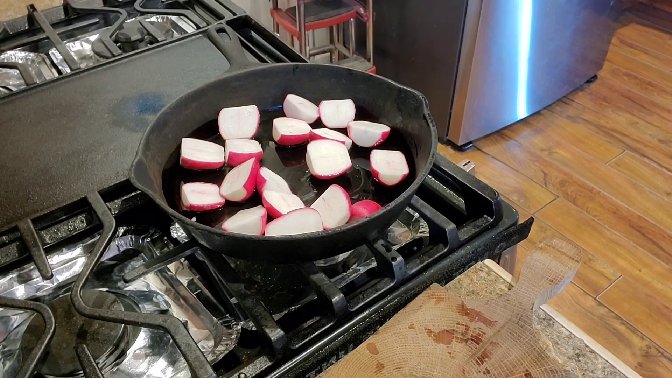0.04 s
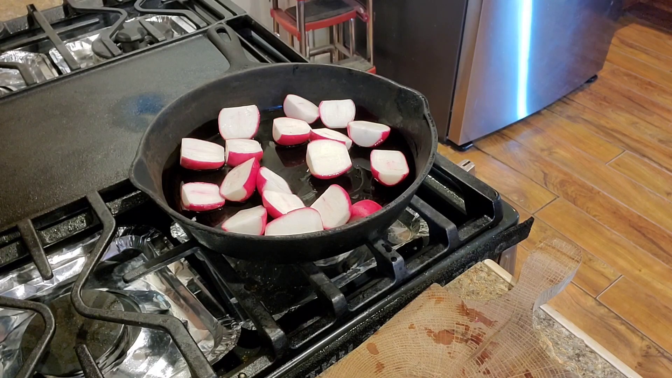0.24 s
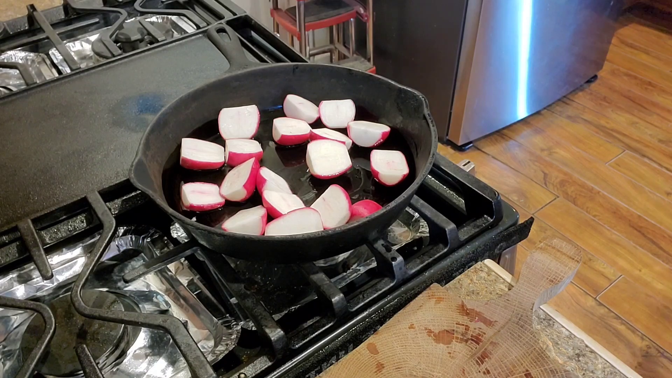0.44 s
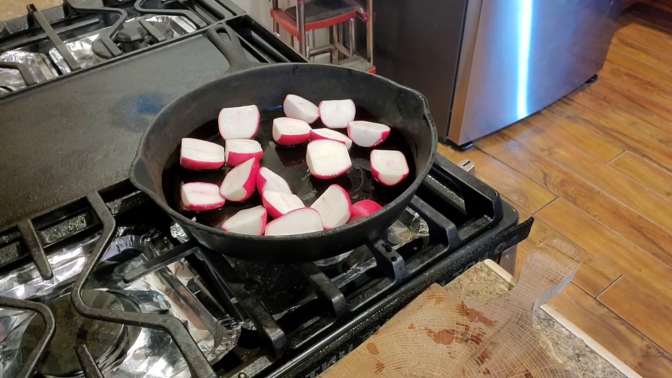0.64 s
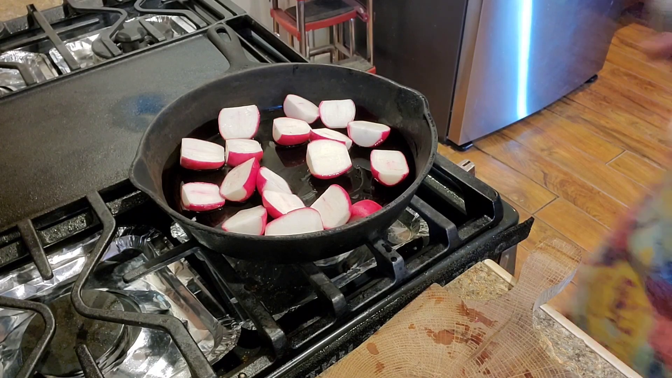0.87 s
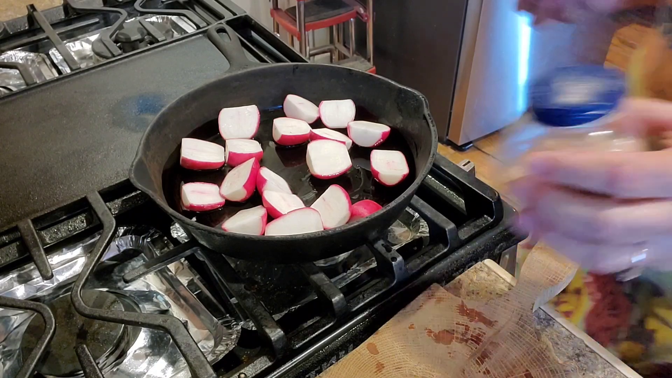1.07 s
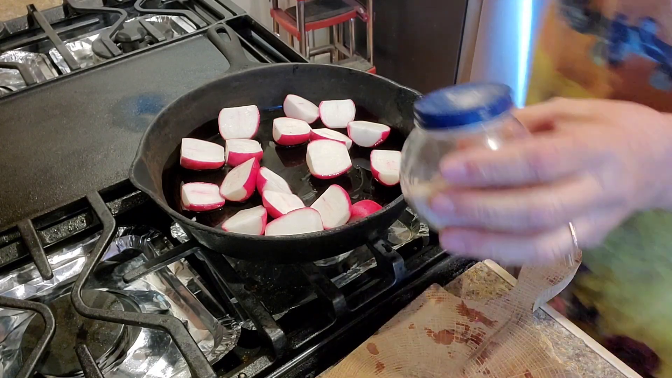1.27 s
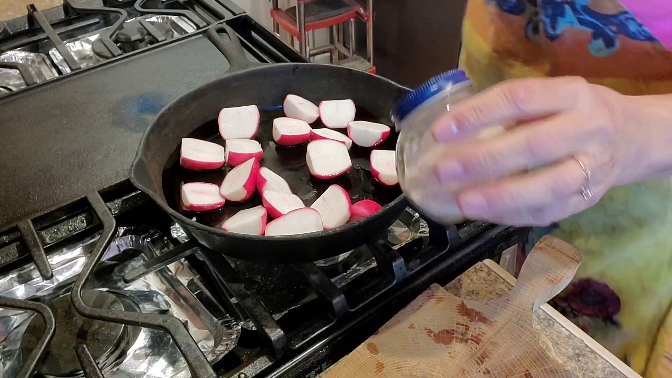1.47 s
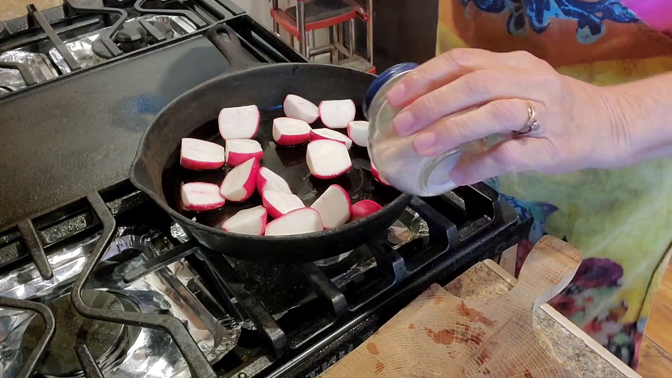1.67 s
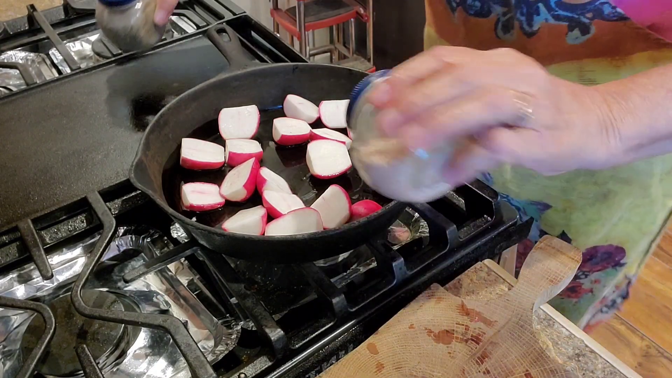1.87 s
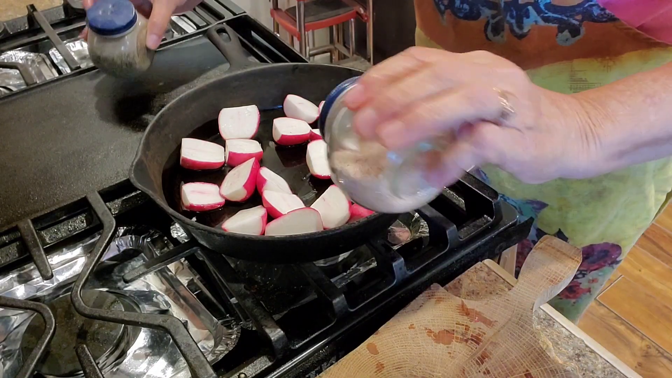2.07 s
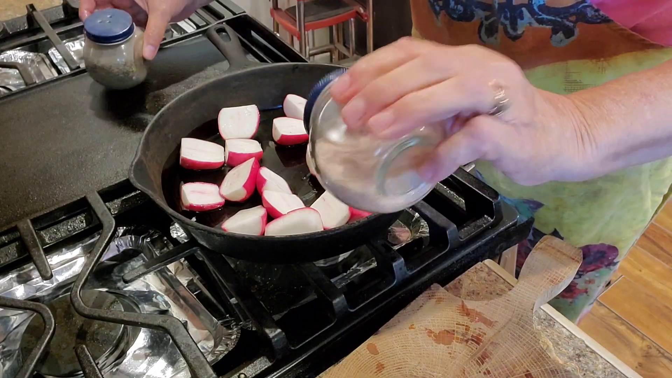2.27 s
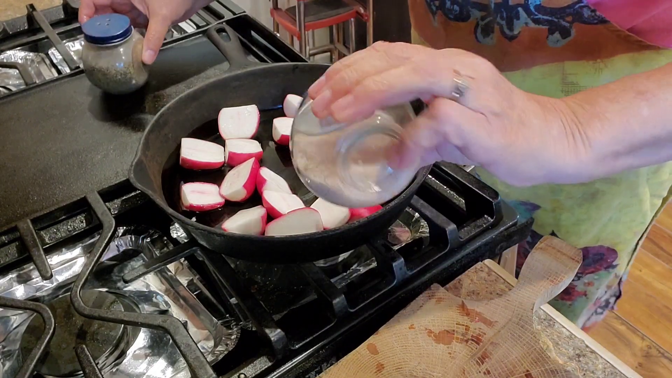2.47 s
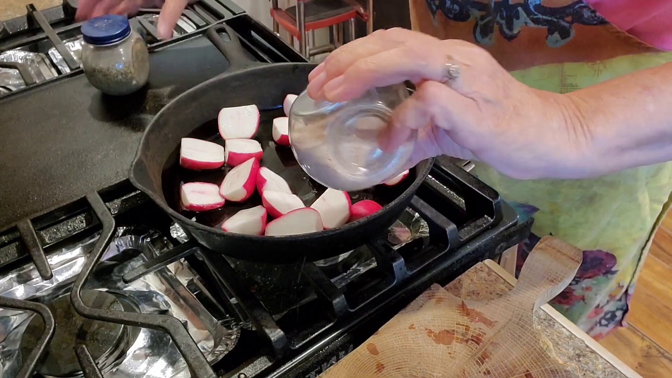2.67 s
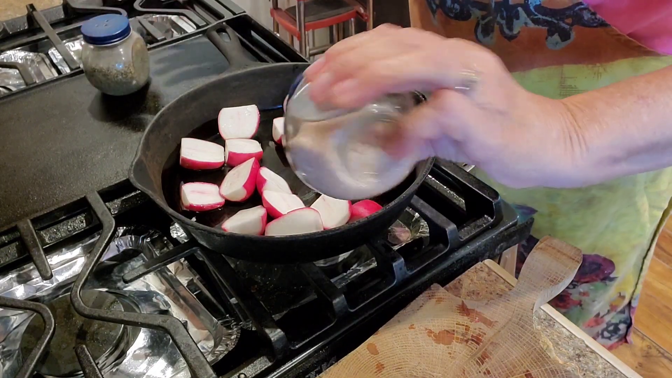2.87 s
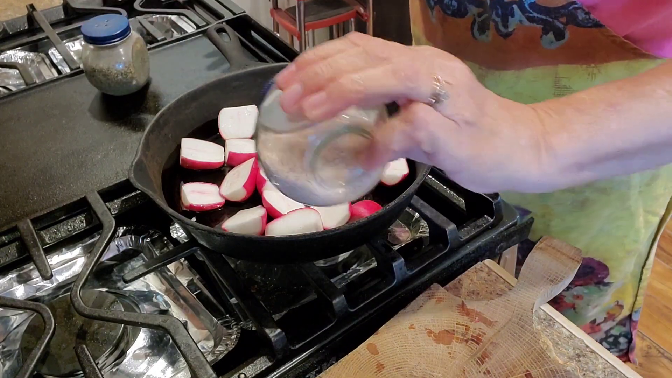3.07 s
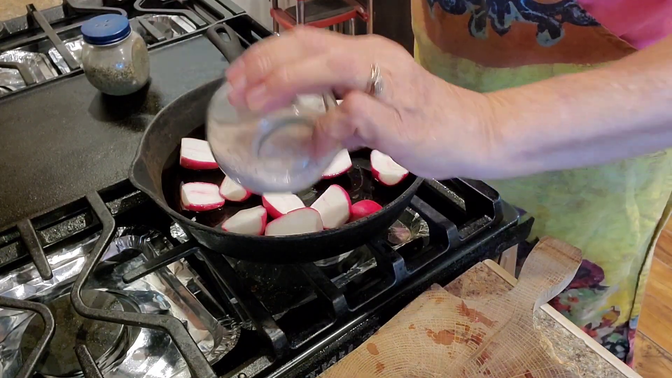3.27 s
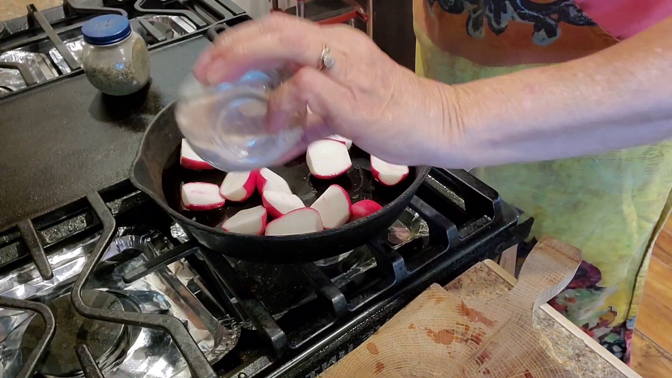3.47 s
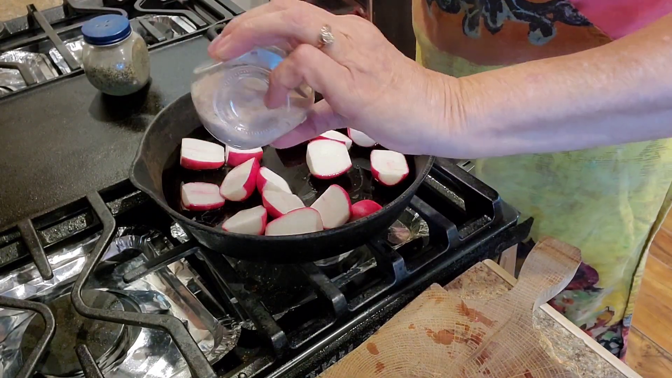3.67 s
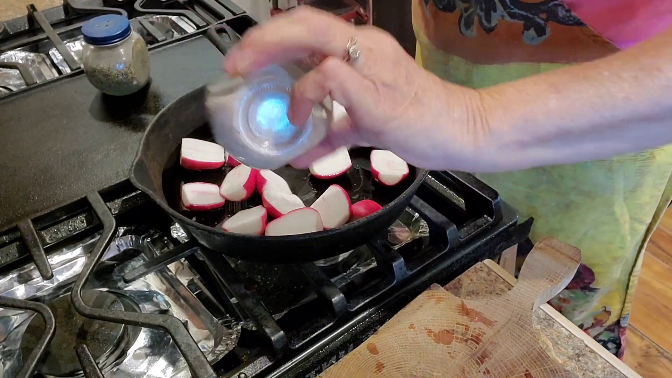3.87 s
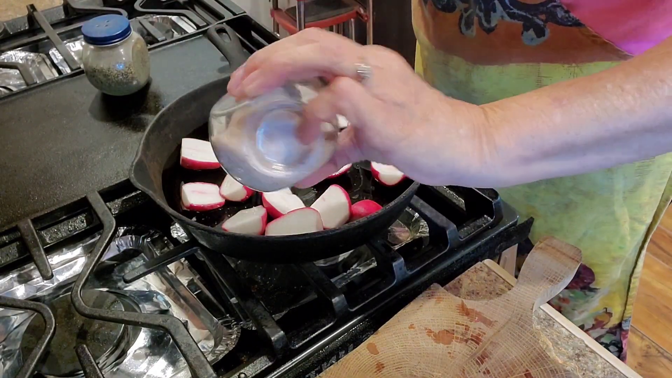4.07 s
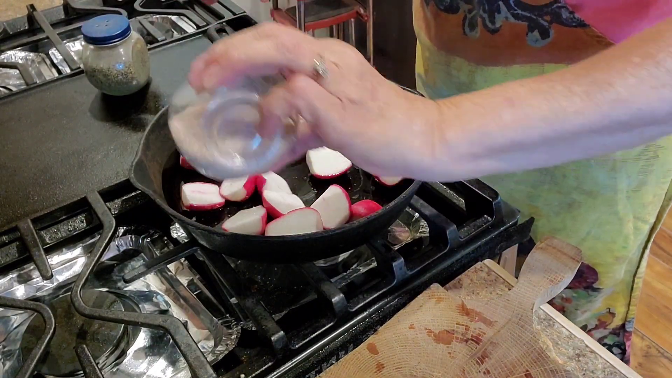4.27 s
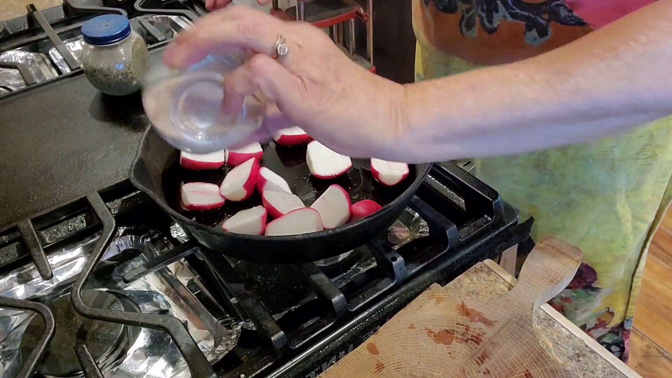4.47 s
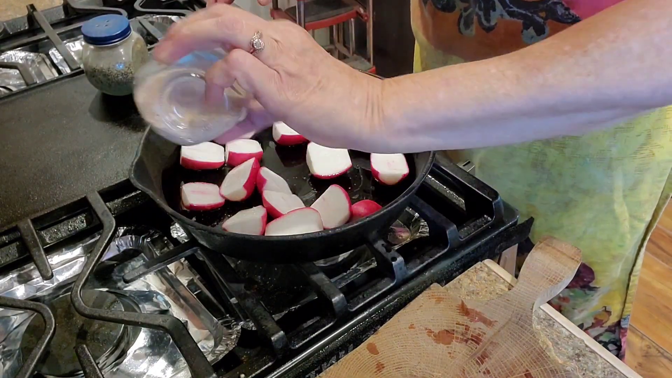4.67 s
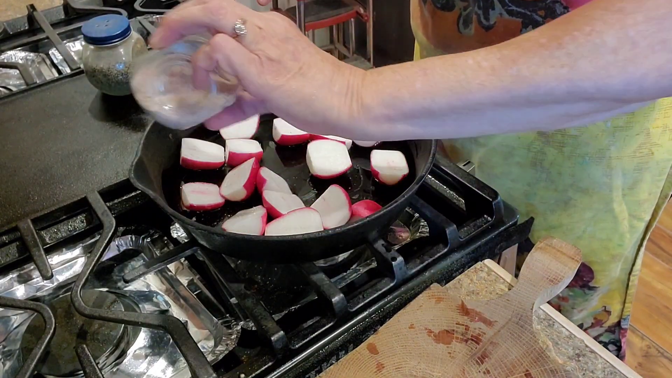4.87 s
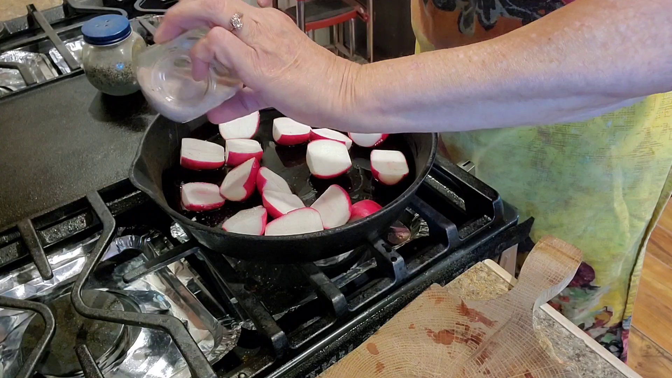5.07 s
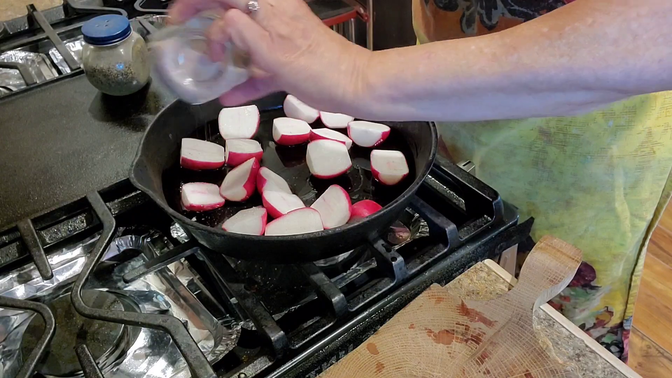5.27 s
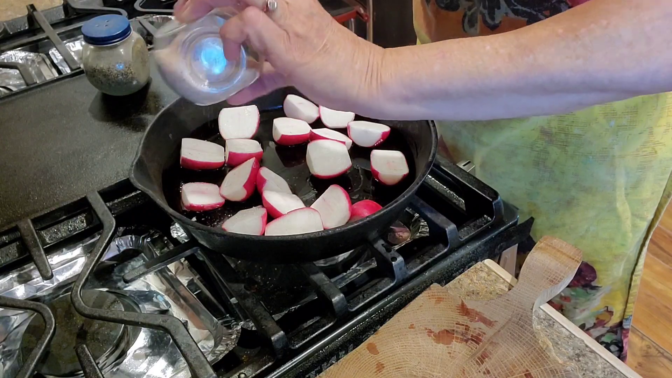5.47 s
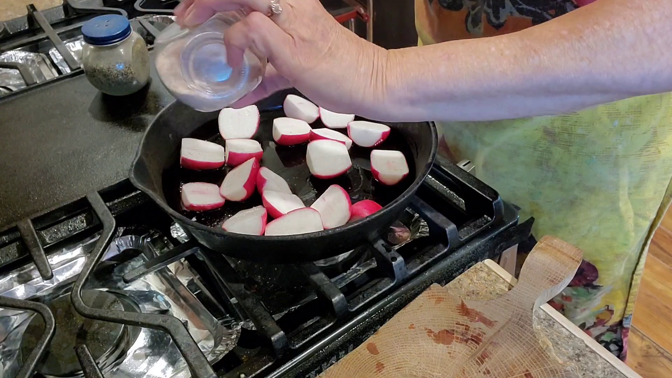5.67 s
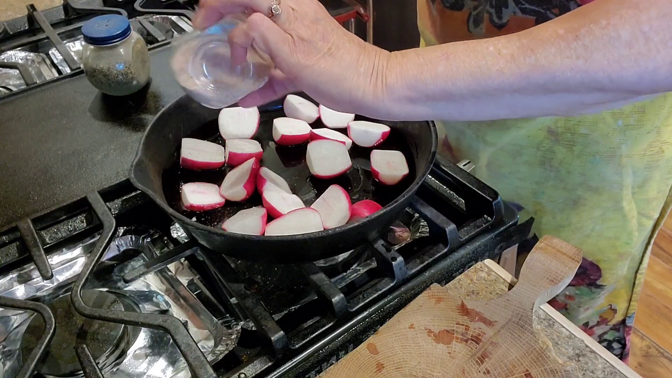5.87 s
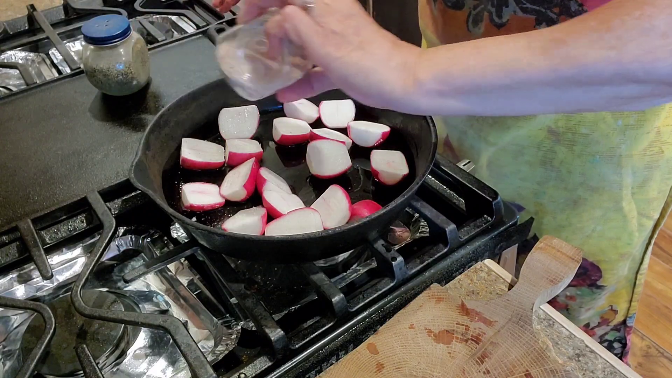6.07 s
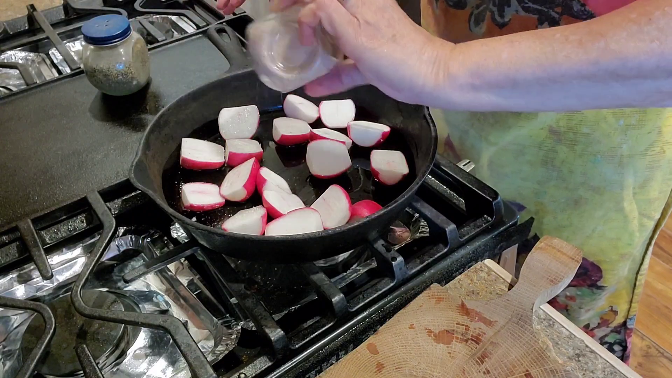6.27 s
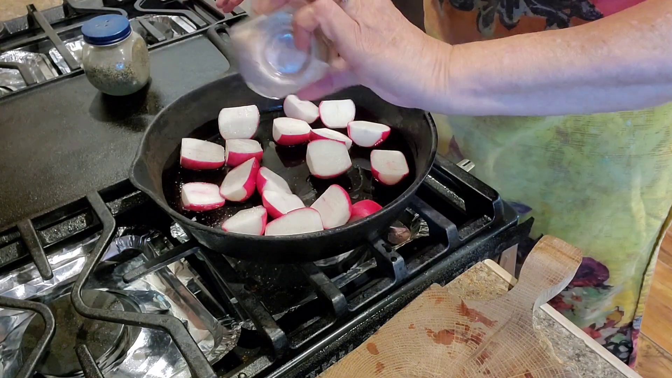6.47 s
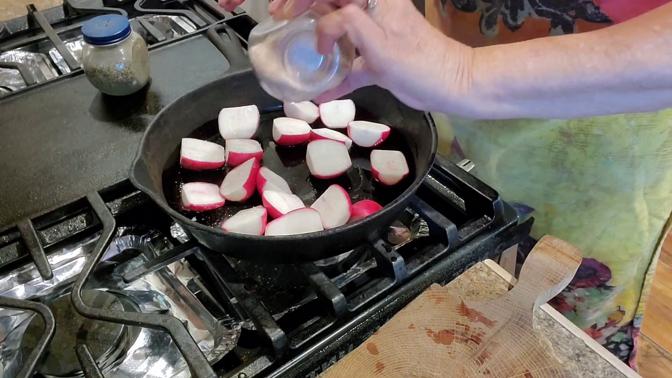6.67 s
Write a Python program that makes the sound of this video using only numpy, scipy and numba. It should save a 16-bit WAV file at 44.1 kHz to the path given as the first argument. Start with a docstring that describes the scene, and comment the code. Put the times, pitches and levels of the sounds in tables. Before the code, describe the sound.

Salt is shaken rhythmically in a glass jar, with a second jar clunking loudly onto an iron griddle over a low kitchen hum.

```python
"""Salt is shaken from a glass jar over a skillet, close to a phone in a small kitchen.
First come clinks, footsteps and wooden knocks. Then the jar tips, salt slides along the glass, and
two strokes throw it at the lid. A second jar lands on the iron griddle hard enough to overload the
microphone. The shaking settles into a beat: on each stroke the grains shower against the lid and
ring the jar's air. An appliance hums the whole time."""
import sys
import numpy as np
from scipy import signal
from scipy.fft import rfft, irfft
from scipy.io import wavfile
from scipy.ndimage import uniform_filter1d
from numba import njit

SR = 44100
rng = np.random.default_rng(int(sys.argv[2]) if len(sys.argv) > 2 else 0)


def transcribe(u):
    """Save the signal u as a 16-bit wav file named by the first command-line argument.

    u: samples, shape (n,) or (channels, n), limited to [-1, 1]; the rate is SR.
    q: integer samples, one column per channel.
    """
    v = np.clip(np.atleast_2d(u).T, -1, 1)
    q = np.round(v * 32767).astype(np.int16)
    wavfile.write(sys.argv[1], SR, q)


N = 296771
TIME = np.arange(N) / SR

# Strokes of the jar: landing_s, rise_s, hiss_db, air_db (compared with the hiss)
STROKES = [(1.891, 0.0045, -24, -24.5), (2.133, 0.0035, -26.5, -23.5), (2.596, 0.042, -36, -36),
           (2.857, 0.038, -36.5, -35), (2.961, 0.0042, -38.5, -31), (3.037, 0.0041, -42.5, -34.5),
           (3.11, 0.056, -37.5, -28), (3.359, 0.04, -43, -28.5), (3.596, 0.013, -27.5, -9),
           (3.841, 0.024, -27, -23), (4.011, 0.002, -55.5, -30), (4.096, 0.019, -24, -14.5),
           (4.32, 0.039, -27, -15), (4.558, 0.035, -23.5, -14.5), (4.789, 0.016, -22.5, -7),
           (5.01, 0.025, -25, -13), (5.239, 0.022, -26, -8.5), (5.465, 0.05, -27.5, -12),
           (5.729, 0.031, -30, -18.5), (5.984, 0.035, -29, -16), (6.224, 0.038, -29.5, -12),
           (6.464, 0.025, -22.5, -11.5), (6.711, 0.052, -31.5, -9)]
# How far the jar is tipped: time_s, tip_share (1 is upside down)
JAR_TIP = [(1.9, 0.49), (3.4, 0.28), (3.85, 0.57), (5.6, 0.93), (6.7, 0.82)]
# Tone of salt hitting the lid: pitch_hz, level_db
SALT_TONE = [(2240, -39.5), (3800, -13.5), (4350, -6), (5300, -5.5), (6580, 0), (8670, 1), (9300, -2),
             (10100, -7), (13000, -16), (15400, -32)]
# High notes of the space inside the jar: pitch_hz, level_db
JAR_NOTES = [(6400, -20.5), (9200, -17)]
LANDING_S, SHOWER_FALL_S = 0.0024, 0.051  # half the salt lands this fast; the shower dies this fast
LID_DB, NORMAL_STROKE_DB = -3, -22  # lid ring on a normal stroke; that stroke's level
LID_TIP_DB, LID_PER_DB = 16.5, 0.15  # more ring with more tip, and on a harder stroke
LID_RING_HZ, LID_SAG_HZ, LID_LOW_EDGE_HZ = 3270, 400, 2770

def shaker():
    """Each stroke throws salt at the lid; as it piles up, the lid's ring sinks and the air tone rises."""
    hiss, lid, air, pile = np.zeros((4, N))
    tip = np.interp(TIME, *np.transpose(JAR_TIP))
    t = np.arange(-SR // 25, SR // 4) / SR  # time around a landing
    early_grains = 0.16 * np.exp(-(t / 0.012) ** 2)
    fall_back = undb(-38) * np.exp(-((t - 0.18) / 0.021) ** 2)
    for landing, rise, db, air_db in STROKES:
        start = landing + t[0]
        dying = np.exp(-(np.maximum(t - rise, 0) / SHOWER_FALL_S) ** 2.77)
        bulk = (ramp(t, LANDING_S) + ramp(t, rise)) / 2 * dying
        flow = undb(db) * np.maximum(early_grains, bulk)
        add(hiss, start, flow + undb(db) * fall_back * tip[int(landing * SR)])
        add(lid, start, flow * undb(LID_DB + LID_PER_DB * (db - NORMAL_STROKE_DB)))
        add(air, start, flow * bulk * undb(air_db) * ramp(t, 0.01))  # the bulk makes a hollow pop
        pile[TIME > start] = ramp(TIME[TIME > start] - landing, rise + SHOWER_FALL_S)
    shower = grains(per_s=14000, spread_db=1.85) * clumps(tip)
    salt = unit(colour(shower, SALT_TONE))
    spot_hz = np.minimum(7520 * np.exp(0.14 * wander(10)), SR / 3)  # moves with where the salt lands
    spray = hiss * unit(salt + undb(-9.5) * resonate(salt, spot_hz, 2000)) * undb(1.5)
    lid_hz = LID_RING_HZ - LID_SAG_HZ * tip ** 2 * (1 + pile) / 2 + 100 * wander(3.5)
    bare = resonate(shower, lid_hz, 850) * undb(0.5) + resonate(shower, 1.48 * lid_hz, 650) * undb(-6)
    bare = high_pass(bare, LID_LOW_EDGE_HZ)
    heaped = (pile * tip) ** 2 * high_pass(resonate(shower, 2500 - 550 * pile, 1600), 1400) * undb(-3.5)
    ring = lid * undb(LID_TIP_DB * (tip - 1)) * (bare + heaped)
    air_hz = np.interp(TIME, [5.3, 6.3], [790, 900])  # the air tone is higher in the last strokes
    air_hz += 170 * pile + 35 * wander(5.1)
    side_notes = resonate(shower, 1100, 140) * undb(-6) + resonate(shower, 560, 120) * undb(-6.5)
    hollow = air * (resonate(shower, air_hz, 230) + pile * side_notes)
    high_notes = sum(resonate(hiss * shower, hz, 400) * undb(db + 4 * wander(6)) for hz, db in JAR_NOTES)
    return spray + ring + hollow + high_notes * np.std(hiss)

def clumps(tip, per_s=100, level_db=3, fade_s=.009):
    """Small clumps make the shower jump in level, most of all in the thin flow of a barely tipped jar."""
    t = np.arange(SR // 100) / SR
    hits = (rng.random(N) < per_s / SR) * rng.random(N) ** 2
    return 1 + undb(level_db) / tip * signal.fftconvolve(hits, fade(t, fade_s))[:N]

# The biggest crystals: start_s, level_db
BIG_CRYSTALS = [(1.907, -9), (1.917, -7), (1.93, -10), (2.158, -7.5), (2.185, -14), (2.65, -13),
                (2.897, -18), (2.932, -17.5), (3.843, -13.5), (4.102, -9), (4.375, -4.5), (4.403, -12),
                (5.035, -5), (5.273, -6), (6.247, -11), (6.47, -3.5)]

def crystals():
    """A big crystal hits the lid alone: a sharp tick with a brief scatter."""
    out, t = np.zeros(N), np.arange(SR // 25) / SR
    for s, db in BIG_CRYSTALS:
        tick = colour(rng.standard_normal(len(t)) * (fade(t, .011) + .35 * fade(t, .035)), SALT_TONE)
        add(out, s, undb(db - 3.5) * tick / np.abs(tick).max())
    return out

# Tilts of the jar: trickle_start_s, heap_gives_way_s, stop_s, trickle_db, rush_db
TILTS = [(1.165, 1.179, 1.3995, -45.5, -34), (1.538, 1.71, 1.956, -50, -33)]
# Two notes that move with the heap: time_s, ring_hz, hollow_hz, hollow_db
HEAP_NOTES = [(1.2, 2950, 1430, -52), (1.311, 3100, 1357, -6), (1.54, 5050, 1060, -22),
              (1.61, 6200, 1210, -10.5), (1.68, 4500, 1730, -7.5), (1.84, 3200, 1660, -5),
              (1.876, 2500, 1400, -7), (1.93, 2400, 850, -10)]
# Tone of salt sliding on glass: pitch_hz, level_db
SLIDE_TONE = [(2000, -30.5), (4000, 0.5), (7200, 4), (9400, -1), (12000, -20), (15000, -30.5)]
TRICKLE_RISE_S, RUSH_RISE_S, SPREAD_S = 0.02, 0.089, 0.047

def slide():
    """A few grains trickle along the glass, then the heap gives way and hisses in uneven spurts."""
    hiss, flow, ring = np.zeros((3, N))
    for start, gives_way, stop, trickle_db, rush_db in TILTS:
        trickle = undb(trickle_db) * ramp(TIME - start, TRICKLE_RISE_S)
        rush = undb(rush_db) * ramp(TIME - gives_way, RUSH_RISE_S)
        moving = np.maximum(trickle, rush) * fade(np.maximum(TIME - stop, 0), 0.14)
        spread = ramp(TIME - start, SPREAD_S) ** 3
        ring += moving * undb(2.5 - 3.5 * spread)  # the first grains ring more than the spread salt
        hiss += moving * spread
        flow += moving
    s, *columns = np.transpose(HEAP_NOTES)
    ring_hz, hollow_hz, hollow_db = (np.interp(TIME, s, column) for column in columns)
    run = grains(per_s=32000, spread_db=-6) * undb(1.2 * wander(45.4))
    patter = grains(per_s=3400, spread_db=0) * undb(0.37 * wander(60))
    hollow = flow * undb(hollow_db) * resonate(patter, hollow_hz, 580)
    return hiss * unit(colour(run, SLIDE_TONE)) + ring * resonate(patter, ring_hz, 1500) + hollow

# The second jar's landings: start_s, level_db, brightness_hz, change_per_bounce_db
JAR_LANDINGS = [(2.3598, 2, 4750, 1), (2.503, -8, 695, -22.5), (2.527, -3.5, 1010, -1.5),
                (2.705, -8.5, 690, -27), (2.7155, -3.5, 1340, -6)]
# Tone of glass hitting iron: pitch_hz, level_db
GRIDDLE_TONE = [(60, -33.5), (200, -15), (450, 8), (700, -2), (1200, 2.5), (1700, -10), (2700, -4),
                (4500, -11), (8000, -7.5), (14000, -22.5)]
# Ringing of the griddle and jar: pitch_hz, level_db, fade_s
GRIDDLE_NOTES = [(308, 3, .19), (468, 0, .2), (522, -6, .15), (564, -6, .35), (602, -3, .2),
                 (834, -12, .28), (1029, -5, .18), (1176, -3, .17), (1250, -6, .22), (1577, -5, .15),
                 (1952, 0, .23), (2205, -8, .18), (2510, -8, .17), (2789, 0, .2), (3555, -5, .14),
                 (4396, -4, .13)]
# The rocking jar's own clunks: start_s, level_db, brightness_hz
CLUNKS = [(2.529, 5.5, 560), (2.56, -5, 1500), (2.595, -1.5, 1070), (2.716, 1.5, 2350)]
# Ringing of those clunks: pitch_hz, level_db, fade_s
CLUNK_NOTES = [(426, 0.5, 0.16), (595, 1.5, 0.12), (839, -6, 0.12), (1159, -2, 0.098), (1284, -6, 0.19),
               (2120, -14, 0.32)]
BOUNCE_S, BRIGHTNESS_KEPT = .015, 0.92

def second_jar():
    """A jar lands on the griddle and rocks to rest; each landing is three quick, ever duller touches."""
    touches = [(s + k * BOUNCE_S * rng.uniform(.8, 1.2), db + k * change_db, hz * BRIGHTNESS_KEPT ** k)
               for s, db, hz, change_db in JAR_LANDINGS for k in range(3)]
    iron = strike(touches, GRIDDLE_TONE, burst_db=-16.5, fade_s=.125, notes=GRIDDLE_NOTES, ring_db=-12.8)
    glass = strike(CLUNKS, GRIDDLE_TONE, burst_db=-27.5, fade_s=0.21, notes=CLUNK_NOTES, ring_db=-15)
    return high_pass(iron + glass, 200, order=4)  # the landings are cut below 200 Hz

# Clinks, and the sharp ticks that open two of the knocks: start_s, level_db, brightness_hz
CLINKS_AND_TICKS = [(.2865, -23.5, 2100), (.3568, -4.5, 16000), (.8348, -39, 5000)]
# Tone of the hit: pitch_hz, level_db
CLINK_TONE = [(200, -6.5), (1000, 0.5), (1500, -9), (2500, 6.5), (4200, -16), (7000, 1), (8500, -18),
              (14000, -50.5)]
# Ringing after it: pitch_hz, level_db, fade_s
CLINK_NOTES = [(815, -1, 0.28), (1059, 6.5, 0.12), (2540, -8, 0.12), (6100, -11, .12)]

def clinks():
    """Hard kitchenware is hit and rings briefly; the same bright tick also opens two of the wooden knocks."""
    return strike(CLINKS_AND_TICKS, CLINK_TONE, burst_db=-17, fade_s=0.11, notes=CLINK_NOTES, ring_db=-11.5)

# Knocks: start_s, level_db, brightness_hz
KNOCKS = [(.2865, -15.5, 5450), (.4548, 2, 7200), (.4625, 3.5, 1460), (.834, -10.5, 2200),
          (4.699, -21.5, 930), (4.728, -15, 777), (4.762, -17.5, 784)]
# Tone of the wood: pitch_hz, level_db
WOOD_TONE = [(40, -17.5), (130, -18.5), (290, -0.5), (750, 0.5), (1090, -3), (1550, -29), (3000, -33.5),
             (7000, -25.5), (11000, -45.5)]

def knocks():
    """Knocked wood gives a dull burst with no clear note."""
    return strike(KNOCKS, WOOD_TONE, burst_db=-18, fade_s=0.18)

# Steps and bumps through the floor: start_s, level_db, brightness_hz
STEPS = [(.285, -0.5, 247), (.835, -3, 246), (1.372, -1.5, 352), (1.76, -6, 68.5), (4.71, -11.5, 249.3)]
# Tone of the floorboards: pitch_hz, level_db
FLOOR_TONE = [(25, -40), (54, 4.5), (78, -6.5), (112, 3.5), (190, 1.5), (300, -11.5), (1000, -53)]

def footsteps():
    """Feet thud on the boards, which rumble while the cook walks up."""
    thuds = strike(STEPS, FLOOR_TONE, burst_db=-23.5, fade_s=0.081, push_s=0.026)
    rumble = swell(s=(0.79, 1.6), db=(-47.5, -47.5)) * undb(wander(24)) * noise(FLOOR_TONE)
    return thuds + rumble

# One list for each squeak: time_s, pitch_hz, level_db
SQUEAKS = [
    [(.63, 1030, -45.5), (.81, 1042, -45.5)],
    [(.62, 3580, -66), (.82, 3590, -56)],
    [(4.62, 641, -51), (4.78, 484, -34.5), (4.95, 518, -66)],
    [(4.95, 1650, -65), (5.48, 1597, -59.5)],
    [(5.13, 794, -65.5), (5.48, 820, -63.5)],
    [(6.06, 1450, -66), (6.23, 1390, -50)],
]

def squeaks():
    """Faint, far-off squeaks and scrapes: thin, unsteady tones."""
    out = np.zeros(N)
    for rows in SQUEAKS:
        s, hz, db = np.transpose(rows)
        level = swell(s, db) * undb(2 * wander(40))
        out += level * resonate(rng.standard_normal(N), np.interp(TIME, s, hz), 0.061 * hz[0])
    return out

# Loudness of the brushing: time_s, level_db
BRUSH_LEVELS = [(0, -56.5), (.2, -67), (.27, -43.5), (.55, -69), (.8, -57.5), (1.1, -78)]
# Its tone: pitch_hz, level_db
BRUSH_TONE = [(150, -0.5), (1150, -3.5), (1900, -25.5), (3200, -18), (14000, -50.5)]
# Loudness of the rubbing: time_s, level_db
RUB_LEVELS = [(.62, -57), (.84, -62), (1.08, -64)]

def rustle():
    """Hands and cloth brush past things on the counter, then rub with a thin, patchy sound."""
    brushing = swell(*np.transpose(BRUSH_LEVELS)) * undb(1.7 * wander(40)) * noise(BRUSH_TONE)
    rubbing = sum(resonate(rng.standard_normal(N), hz, width_hz=2000) * undb(3 * wander(15.8)) / hz
                  for hz in (4800, 7400))
    return brushing + swell(*np.transpose(RUB_LEVELS)) * unit(rubbing)

# Notes of the motor: pitch_hz, level_db
HUM_NOTES = [(59.2, -53), (118.4, -74), (177.6, -63)]
# Tone of the room noise: pitch_hz, level_db
KITCHEN_TONE = [(25, -32.5), (50, 1.5), (80, -9.5), (300, -19), (700, -33), (1500, -41.5), (9000, -38),
                (15000, -51)]
# The phone's level control on both, as a set curve: time_s, level_db
PHONE_LEVELS = [(.2, -11), (.4, -2), (2.6, 0.5), (3.3, -8.5), (3.7, 0)]

def appliance():
    """A motor hums steadily over soft room noise."""
    hum = sum(undb(db + 0.85 * wander(17)) * np.sin(2 * np.pi * (hz * TIME + rng.random()))
              for hz, db in HUM_NOTES)
    room_noise = undb(-57 + 0.4 * wander(13)) * noise(KITCHEN_TONE)
    # the phone's level control fades both in and lowers them after the loud landing
    return (np.sqrt(2) * hum + room_noise) * undb(np.interp(TIME, *np.transpose(PHONE_LEVELS)))

# Tone of the kitchen's echo: pitch_hz, level_db
ECHO_TONE = [(80, -4), (300, -1.5), (15000, -5.5)]

def room(x, echo_db, fade_s):
    """Sound bounces around the kitchen and blurs into a short tail."""
    t = np.arange(SR * 3 // 4) / SR
    tail = colour(rng.standard_normal(len(t)) * fade(t, fade_s) * np.clip(t / 0.022 - .3, 0, 1), ECHO_TONE)
    return x + undb(echo_db) * signal.fftconvolve(x, tail / np.sqrt(np.sum(tail ** 2)))[:N]

def strike(blows, tone, burst_db, fade_s, notes=(), ring_db=0, push_s=1 / SR):
    """Each blow on an object makes a noisy burst plus any clear notes; a soft touch dulls both."""
    out, t, last = np.zeros(N), np.arange(SR // 2) / SR, -np.inf
    burst = fade(t, fade_s) * ramp(t, push_s)
    rings = [(hz, undb(ring_db + note_db) * fade(t, ring_s)) for hz, note_db, ring_s in notes]
    for s, db, bright_hz in blows:
        sound = colour(rng.standard_normal(len(t)) * burst, tone)
        sound = undb(burst_db) * sound / np.sqrt(np.mean(sound[:SR // 30] ** 2))
        pressed_db = -3.5 * np.exp(last - s)  # still pressed down by the last touch, it rings less
        last = s
        for hz, decay in rings:
            shifted_hz = hz + 3 * rng.standard_normal()  # each touch shifts the notes a little
            ring = decay * np.sin(2 * np.pi * shifted_hz * t)
            sound += ring * undb(pressed_db + rng.standard_normal()) * rng.choice([-1, 1])
        dulling = signal.butter(2, min(bright_hz, SR / 3), fs=SR, output="sos")
        add(out, s, undb(db) * signal.sosfilt(dulling, sound))
    return out

def grains(per_s, spread_db):
    """Many tiny hits at random times, some harder than others."""
    size = undb(spread_db * np.minimum(rng.exponential(size=N), 6))
    return unit((rng.random(N) < per_s / SR) * size * rng.standard_normal(N))

def noise(tone):
    """Steady noise with the given tone."""
    return unit(colour(rng.standard_normal(N), tone))

def colour(x, tone):
    """Shape a sound by (pitch_hz, level_db) points, with no ringing ahead of a hit."""
    size = 4096
    hz, db = np.transpose(tone)
    log_hz = np.log(np.arange(size // 2 + 1) * SR / size + 1)
    cepstrum = irfft(np.log(undb(np.interp(log_hz, np.log(hz), db))))
    cepstrum[1:size // 2] *= 2
    cepstrum[size // 2 + 1:] = 0
    return signal.fftconvolve(x, irfft(np.exp(rfft(cepstrum))))[:len(x)]

@njit
def band_pass(x, hz, width_hz):
    """Keep the sound near a moving pitch."""
    y, band, low = np.empty(len(x)), 0., 0.
    for i in range(len(x)):
        step, damping = np.tan(np.pi * hz[i] / SR), width_hz / hz[i]
        now = (band + step * (x[i] - low)) / (1 + step * (step + damping))
        band, low, y[i] = 2 * now - band, low + 2 * step * now, damping * now
    return y

def resonate(x, hz, width_hz):
    """Make a sound ring around one pitch, at average level 1."""
    centre = hz * np.ones(N)
    return unit(band_pass(band_pass(x, centre, float(width_hz)), centre, float(width_hz)))

def high_pass(x, hz, order=6):
    """Cut away the sound below hz."""
    return signal.sosfilt(signal.butter(order, hz, "high", fs=SR, output="sos"), x)

def wander(per_s):
    """Smooth random drift, roughly 1 either way."""
    hold = int(SR / per_s)
    steps = np.repeat(rng.standard_normal(N // hold + 1), hold)
    return 2.1 * uniform_filter1d(uniform_filter1d(steps, hold), hold)[:N]

def swell(s, db):
    """Follow a loudness curve, easing to silence outside it."""
    inside = (TIME >= s[0]) & (TIME <= s[-1])
    return uniform_filter1d(inside * undb(np.interp(TIME, s, db)), SR // 70)

def ramp(t, length_s):
    """Rise from 0 to 1 over length_s."""
    return np.clip(t / length_s, 0, 1)

def fade(t, fade_s):
    """Die away by 60 dB every fade_s."""
    return np.exp(-np.log(1000) * t / fade_s)

def add(out, s, sound):
    """Mix a sound in at time s."""
    i = int(s * SR)
    out[i:i + len(sound)] += sound[:N - i]

def undb(db):
    """Turn decibels into a multiplier."""
    return 10 ** (np.asarray(db) / 20)

def unit(x):
    """Scale to an average (rms) level of 1."""
    return x / np.sqrt(np.mean(x ** 2))

def scene():
    """The salt is close, with little echo; the knocks carry more of the room."""
    salt = room(shaker() + crystals() + slide(), echo_db=-17.5, fade_s=0.15)
    bumps = room(second_jar() + clinks() + knocks() + footsteps(), echo_db=-13.5, fade_s=0.24)
    mono = salt + bumps + squeaks() + rustle() + appliance()
    return np.array([mono, mono])

def record(dry):
    """The microphone flattens peaks that are too loud, and the highest treble is cut."""
    treble_cut = signal.ellip(8, .2, 70, 15500, fs=SR, output="sos")
    return signal.sosfilt(treble_cut, np.clip(dry, -1, 1))

dry = scene()
out = record(dry)
transcribe(out)
```